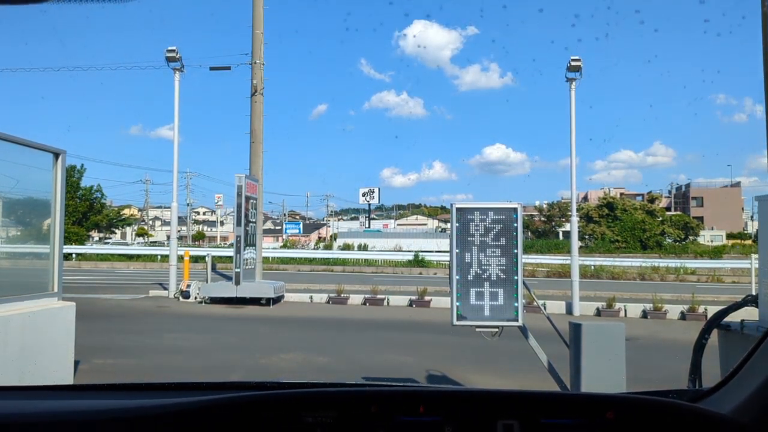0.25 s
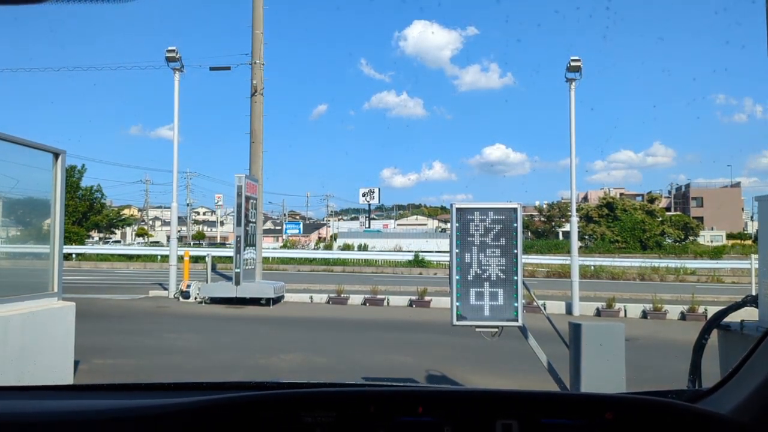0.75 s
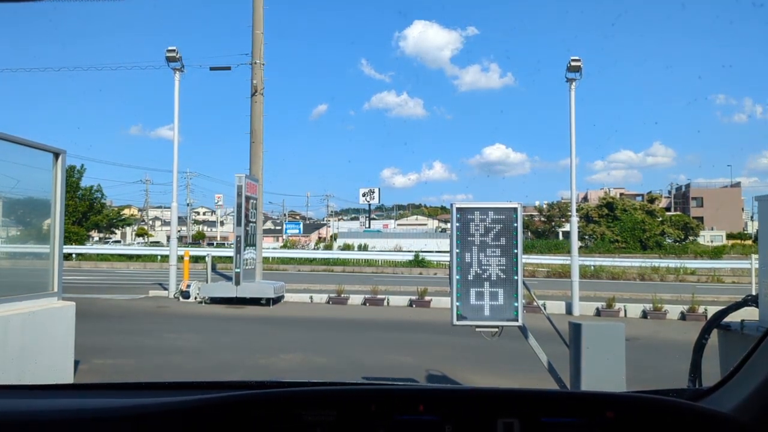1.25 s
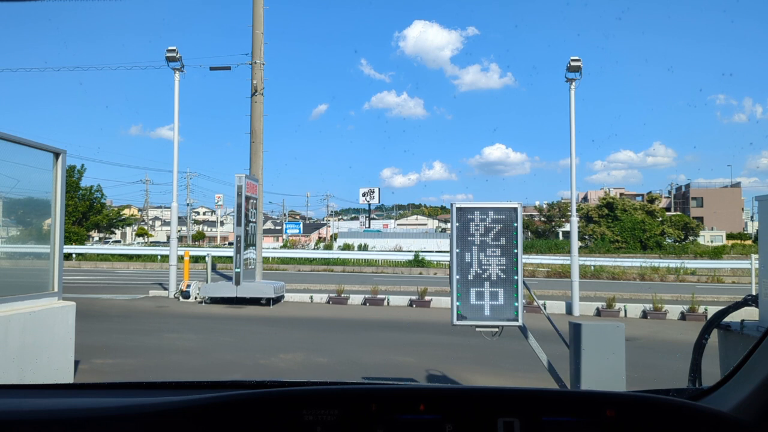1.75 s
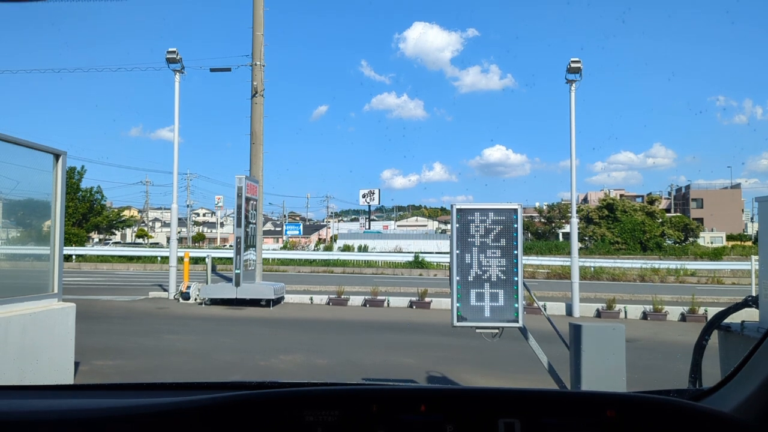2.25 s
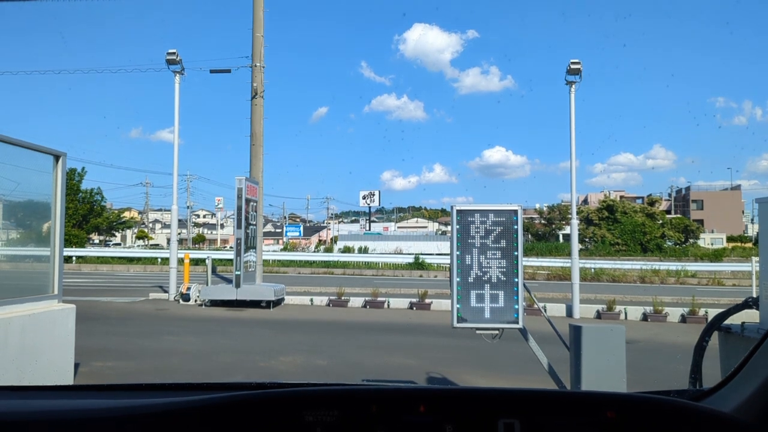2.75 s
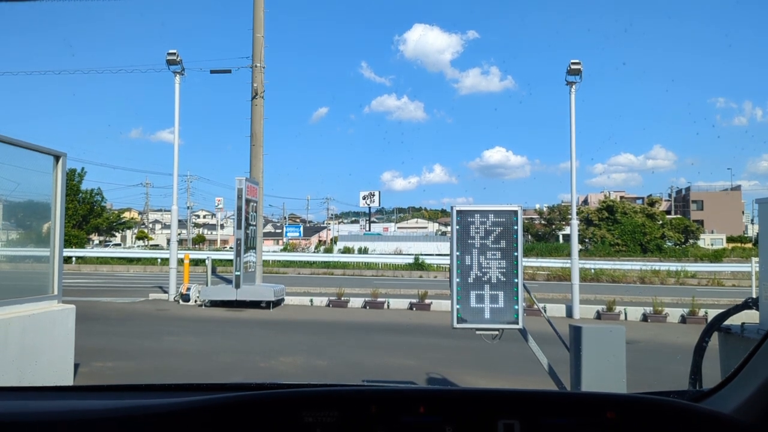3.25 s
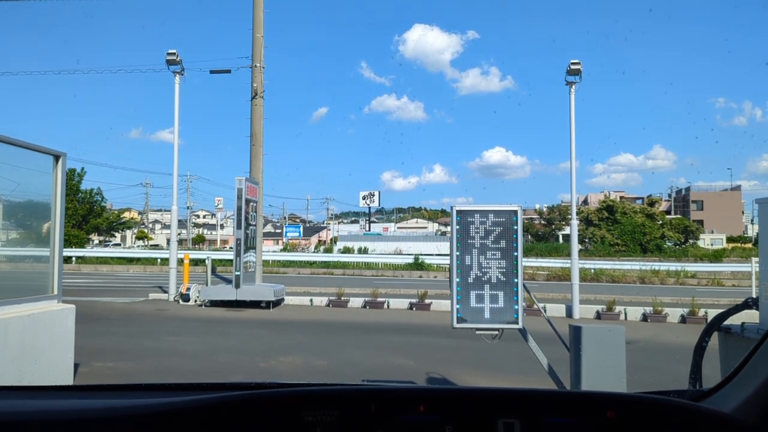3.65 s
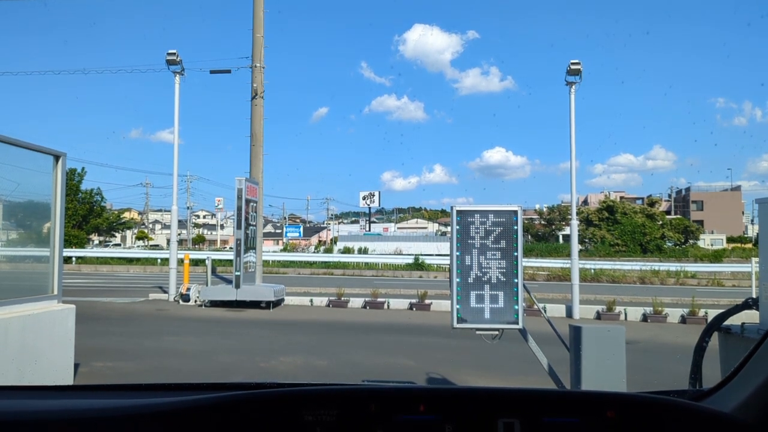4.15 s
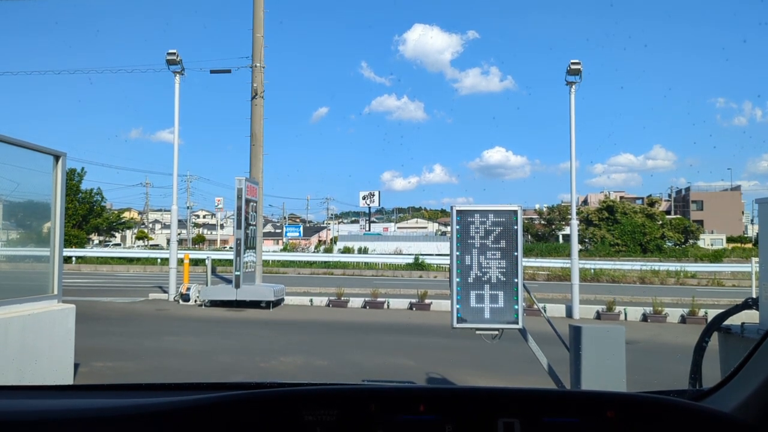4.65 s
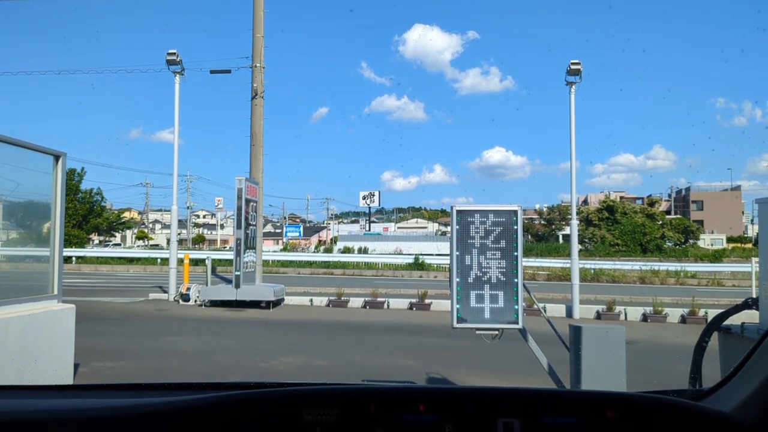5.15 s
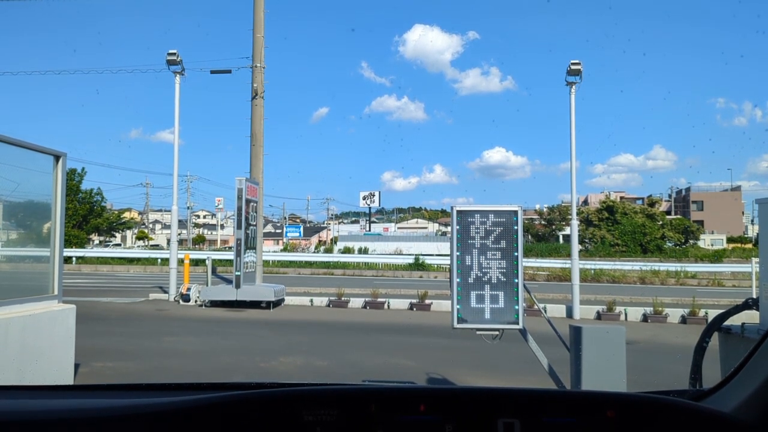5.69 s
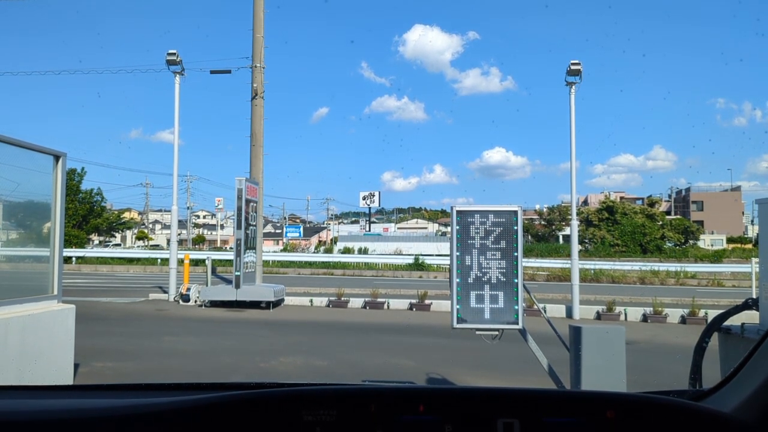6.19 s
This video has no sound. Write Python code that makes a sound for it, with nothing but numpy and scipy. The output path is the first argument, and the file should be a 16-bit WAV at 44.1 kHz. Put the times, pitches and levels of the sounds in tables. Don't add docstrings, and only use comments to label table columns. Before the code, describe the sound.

Heard from a seat inside a closed car in an automatic wash, large drying blowers make a continuous deep, fluttering boom with a muffled rush of air. Faint hiss leaks at the right window. Tiny drops tick there mostly in the first two seconds, then grow sparse. Late on, a sheet of water lightly slaps the glass as the roar continues.

```python
import sys
import numpy as np
from scipy import signal
from scipy.fft import rfft, irfft, next_fast_len
from scipy.io import wavfile
from scipy.ndimage import uniform_filter1d, map_coordinates

SR = 44100
rng = np.random.default_rng(int(sys.argv[2]) if len(sys.argv) > 2 else 0)


def decibels_to_gain(level_db):
    exponent = np.asarray(level_db, float) / 20
    return 10 ** exponent


def master(y):
    cut = np.clip(np.atleast_2d(y).T, -1, 1)
    pcm = np.round(cut * 32767)
    wavfile.write(sys.argv[1], SR, pcm.astype(np.int16))


N = 283386
TIME_S = np.arange(N) / SR
SIZE = next_fast_len(N)
HZ = np.fft.rfftfreq(SIZE, 1 / SR)


def unit(x):
    return x / np.sqrt(np.mean(x ** 2) + 1e-20)


def along(points):
    hz, value = np.transpose(points)
    return np.interp(np.log(HZ + 1), np.log(hz + 1), value)


def to_time(spectrum):
    return unit(irfft(spectrum, SIZE)[..., :N])


def wobble(knots_per_s):
    knots = rng.standard_normal(int(N * 40 / SR) + 9)
    return map_coordinates(knots, [TIME_S * knots_per_s])


def turbulence(patchy_db, channels=1):
    z = signal.stft(rng.standard_normal((channels, SIZE)), nperseg=512)[2]
    patches = uniform_filter1d(rng.standard_normal(z.shape[1:]), size=6, axis=0)
    patches = uniform_filter1d(patches, size=12, axis=1)
    noise = signal.istft(z * decibels_to_gain(patchy_db * unit(patches)), nperseg=512)[1]
    return rfft(noise, SIZE)


def swells(rest_db, events, half_s):
    t = np.arange(0, N + 64, 64) / SR
    bells = sum(decibels_to_gain(db) ** 2 * np.exp(-((t - s) / half_s) ** 2) for s, db in events)
    return np.sqrt(decibels_to_gain(rest_db) ** 2 + np.interp(TIME_S, t, bells))


def resonating(modes, steep, apart):
    both = 0
    for hz, width_hz, db, pan_db in modes:
        shape = (1 + (2 * (HZ - hz) / width_hz) ** 2) ** (-steep / 2)
        shared, differing = rfft(rng.standard_normal((2, SIZE))) * shape
        pair = shared + [[apart], [-apart]] * differing
        both = both + pair * decibels_to_gain(db + np.array([[pan_db], [-pan_db]]) / 2)
    return to_time(both)


def steadied(x, span_s):
    span = round(span_s * SR)
    power = uniform_filter1d(np.mean(x ** 2, axis=0), size=span)
    power = np.abs(uniform_filter1d(power, size=span))
    return unit(x / np.sqrt(power + 0.16))


# (frequency [Hz], width [Hz], level [dB], left minus right [dB])
BOOM_MODES = [(80, 12, -10.5, -8), (97.4, 15.7, -0.5, -2.5), (108.4, 12.7, 0.15, -1.2),
              (128.3, 13, -5.5, -1.5)]
# (time [s], peak level [dB])
SLAMS = [(0.15, -26.5), (1.06, -26.5), (1.16, -33), (1.34, -24), (1.66, -28), (2.03, -23), (2.58, -29),
         (2.69, -24), (2.99, -29.5), (3.13, -26.5), (3.23, -29), (3.33, -30.5), (3.5, -29.5), (3.74, -31.5),
         (3.89, -32.5), (4.0, -30), (4.23, -30), (4.38, -30), (4.57, -26.5), (4.7, -30.5), (4.99, -31.5),
         (5.11, -24), (5.49, -30), (5.61, -30.5), (5.75, -32.5), (5.83, -27.5), (5.99, -30), (6.1, -25.5)]
LULLS = [.27, .78, 1.02, 1.1, 2.08, 2.16, 2.5, 2.65, 2.89, 3.57, 4.09, 4.33, 4.91, 5.05, 5.44, 6.25]


def boom():
    lull_db, lull_half_s = -5, 0.021
    gain = swells(-33 + 0.31 * TIME_S + 1.5 * wobble(11), SLAMS, half_s=0.022)
    gain = gain * decibels_to_gain(lull_db * sum(np.exp(-((TIME_S - s) / lull_half_s) ** 2) for s in LULLS))
    return gain * steadied(resonating(BOOM_MODES, steep=1.57, apart=0.042), span_s=0.06)


# (frequency [Hz], width [Hz], level [dB], left minus right [dB])
DRONE_MODES = [(144.5, 16, -0.5, -3), (165.5, 16.6, 0.5, -2), (194.3, 16, -11, -6)]
# (time [s], peak level [dB])
THROBS = [(0.33, -36.5), (0.56, -30), (0.72, -29), (1.15, -34), (1.32, -36), (1.45, -32.0), (1.52, -34.5),
          (1.8, -31.5), (2.03, -35.5), (2.27, -35.5), (2.62, -33), (3.63, -30.5), (4.11, -33),
          (4.45, -36.5), (4.62, -30.5), (4.8, -34.5), (5.33, -35.5), (5.41, -36), (5.67, -34),
          (6.24, -30.5)]


def drone():
    gain = swells(-37 - 0.27 * TIME_S + 1.2 * wobble(12), THROBS, half_s=0.029)
    return gain * steadied(resonating(DRONE_MODES, steep=1.52, apart=0.048), span_s=0.067)


# (frequency [Hz], width [Hz], level [dB], left minus right [dB])
ROOF_MODES = [(243, 30, -11.5, 16), (271.8, 16, -4, 6.5), (295.5, 18.3, 1.5, -2.5), (323.8, 20, -2, 5.5),
              (351, 14, -6, 4.5), (388, 21, -7, -5.5)]
# (time [s], peak level [dB])
SHUDDERS = [(2.2, -37.5), (3.01, -36.5), (3.15, -40.5), (3.45, -40), (3.69, -36), (3.9, -37.5), (4.14, -39),
            (4.3, -39.5), (4.79, -36.5), (5.23, -37), (5.39, -36.5), (5.59, -34.5), (5.83, -37.5),
            (6.04, -33.5), (6.17, -37), (6.38, -40)]


def roof():
    gain = swells(-44 + 0.7348 * TIME_S, SHUDDERS, half_s=0.021)
    return gain * steadied(resonating(ROOF_MODES, steep=1.63, apart=0.17), span_s=0.14)


# (frequency [Hz], width [Hz], level [dB], left minus right [dB])
GLASS_MODES = [(419.7, 4.7, -4.5, -0.2), (462, 34, -13, 0.7), (488.3, 20, -10.5, 0), (510, 19.6, -4.5, 2.8),
               (567, 58, -17, -5.5), (650, 29, -19.5, -13.5), (716, 14, -18.5, -4), (760, 33, -16.5, -1),
               (775, 26, -20.5, 0), (827, 15, -16, 5)]
# (time [s], peak level [dB])
RATTLES = [(0.59, -45.0), (1.05, -48), (1.34, -43.0), (1.68, -43), (2.45, -41.5), (2.81, -43.0),
           (3.16, -42), (3.32, -45), (3.69, -51), (3.79, -44.5), (4.74, -45.5), (5.54, -42)]


def glass():
    gain = swells(-48 + 0.19 * TIME_S, RATTLES, half_s=0.021)
    return gain * steadied(resonating(GLASS_MODES, steep=1.58, apart=0.22), span_s=0.081)


# (frequency [Hz], width [Hz], level [dB], left minus right [dB])
VENT_MODE = [(57.2, 16, 0, -.3)]


def breathing():
    return decibels_to_gain(-45.5) * steadied(resonating(VENT_MODE, steep=2.0, apart=0.06), span_s=0.25)


# (frequency [Hz], density [dB per Hz])
ROAR_COLOUR = [(150, -30), (300, -1), (600, -6.5), (800, -4.5), (1000, -10), (1400, -13.5), (1800, -18),
               (2500, -25), (4000, -24), (5500, -35.5), (7500, -47), (10000, -63)]
# (frequency [Hz], share [0..1])
ROAR_ALIKE = [(300, 0.77), (700, 0.25), (950, 0.25), (1300, 0.52), (1600, .5), (2200, 0.58), (3500, 0.06),
              (5000, 0.15), (8000, .05)]
# (frequency [Hz], width [Hz], level [dB])
ROAR_RIPPLE = [(1368, 21, 3.5), (1502, 23, 6), (2364, 110, 3.5), (4400, 130, -8)]


def roar(gust):
    lead_s = 0.00036
    shared, left, right = turbulence(patchy_db=0.5, channels=3)
    alike = np.clip(along(ROAR_ALIKE), 0, 1)
    late = np.exp(-2j * np.pi * HZ * lead_s)
    pair = np.sqrt(alike) * np.array([shared, shared * late])
    pair = pair + np.sqrt(1 - alike) * np.array([left, right])
    ripple_db = sum(db / (1 + (2 * (HZ - hz) / width_hz) ** 2) for hz, width_hz, db in ROAR_RIPPLE)
    level_db = -46 + 0.1648 * TIME_S + 0.25 * gust
    return decibels_to_gain(level_db) * to_time(pair * decibels_to_gain(along(ROAR_COLOUR) + ripple_db))


# (frequency [Hz], density [dB per Hz])
SEAL_COLOUR = [(1200, -23.5), (2200, -3.5), (3000, -2.5), (4000, -.5), (4900, -1.5), (5650, -4.5),
               (6100, -9.5), (6700, -12), (7500, -16), (8600, -25), (9800, -38.5), (12000, -56)]


def seal(gust):
    hiss = to_time(turbulence(patchy_db=0.8)[0] * decibels_to_gain(along(SEAL_COLOUR)))
    flutter_db = 0.15 * wobble(7) + 0.54 * wobble(35)
    return decibels_to_gain(-55.2 + 0.38 * gust + flutter_db) * hiss


# (time [s], level [dB], t60 [s])
SLAPS = [
    (5.479, -60, .05),
    (5.492, -47.5, .05),
    (5.497, -48, .05),
    (5.503, -49.5, .13),
]
# (frequency [Hz], density [dB per Hz])
SLAP_COLOUR = [(700, -14), (1500, 3), (3300, 0), (5500, -5), (8000, -21), (12500, -28), (14000, -42)]


def slap():
    fade = 0
    for s, db, t60_s in SLAPS:
        since_s = TIME_S - s
        fade = fade + decibels_to_gain(db - 60 * np.clip(since_s, 0, 1) / t60_s) * (since_s > 0)
    return fade * to_time(turbulence(patchy_db=-1.0, channels=2) * decibels_to_gain(along(SLAP_COLOUR)))


# (time [s], peak level [dB], pitch [Hz])
DROPS = [(.097, -74, 11600), (.215, -68, 8600), (.298, -68, 8500), (.4062, -61, 8900), (.550, -64, 7700),
         (.5725, -64, 11800), (.650, -66, 8600), (.787, -75, 11300), (.8105, -57, 7650), (.8107, -59, 8400),
         (.9355, -67, 9400), (1.058, -58, 6800), (1.545, -61, 7400), (1.703, -63, 7700), (1.754, -64, 8300),
         (1.855, -62, 7400), (1.895, -64, 8700), (1.964, -60, 6500), (2.0835, -67, 9400),
         (2.0838, -72, 11300), (2.863, -59, 6900), (3.365, -62, 7700), (4.415, -70, 11400),
         (4.663, -67, 9000), (5.494, -55, 5100), (5.496, -55, 3900), (5.496, -55, 1700), (5.502, -56, 5600),
         (6.106, -67, 9800), (6.111, -64, 8500)]


def drops():
    out = np.zeros(N + SR)
    t = np.arange(SR // 50) / SR
    sag = 1 + 0.05 * np.exp(-t / 0.0005)
    attack = (1 - np.exp(-t / 0.00014)) ** 2
    for s, db, hz in DROPS:
        fade_s = 0.0035 + 0.012 * decibels_to_gain(1.5 * (db + 53))
        ping = np.sin(2 * np.pi * hz * t * sag) * attack
        out[round(s * SR):][:len(t)] += decibels_to_gain(db + 13.5 - 75 * t / fade_s) * ping
    return out[:N]


# (time [s], mist level [dB])
WETNESS = [
    (0, -77),
    (2, -78),
    (2.6, -86.5),
    (4, -87),
    (6, -76),
    (6.43, -80),
]
# (frequency [Hz], density [dB per Hz])
MIST_COLOUR = [(4000, -24), (6000, -0.5), (7500, 0.5), (9000, -4), (10300, -17.5), (11800, -9.5),
               (13000, -20)]


def mist():
    ticks_per_s = 1500
    sizes = np.clip(rng.standard_normal(SIZE) ** 3, -6, 6)
    ticks = (rng.random(SIZE) < ticks_per_s / SR) * sizes
    level_db = np.interp(TIME_S, *np.transpose(WETNESS))
    return decibels_to_gain(level_db) * to_time(rfft(ticks) * decibels_to_gain(along(MIST_COLOUR)))


# (frequency [Hz], density [dB per Hz])
PREAMP_COLOUR = [(3000, -9), (9000, -2), (12000, -2), (14800, 0.5), (15400, -3.5)]


def preamp():
    own = to_time(turbulence(patchy_db=2.5, channels=3) * decibels_to_gain(along(PREAMP_COLOUR)))
    return decibels_to_gain(-83.0) * (own[:2] + 0.45 * own[2])


def scene():
    gust = wobble(4.5)
    cabin = boom() + drone() + roof() + glass() + breathing() + roar(gust)
    window = (seal(gust) + mist()) * decibels_to_gain([[-22], [0]])  # left, right dB
    water = drops() * decibels_to_gain([[-19], [0]]) + slap() * decibels_to_gain([[-4], [0]])
    return cabin + window + water


def roll_off(x):
    return signal.sosfilt(signal.butter(12, 15720, fs=SR, output="sos"), x)


def record(dry):
    bass_cut = (1 + (45 / (HZ + 1)) ** 18) ** -0.5 + decibels_to_gain(-26)
    heard = irfft(rfft(dry, SIZE) * bass_cut, SIZE)[:, :N]
    end_dip = np.clip(0.45 + TIME_S[::-1] / 0.006, 0, 1)
    return roll_off(heard * end_dip + preamp())


dry = scene()
out = record(dry)
master(out)
```